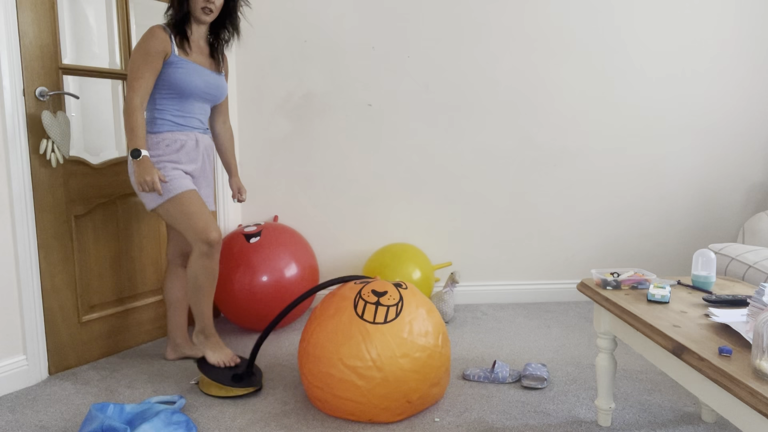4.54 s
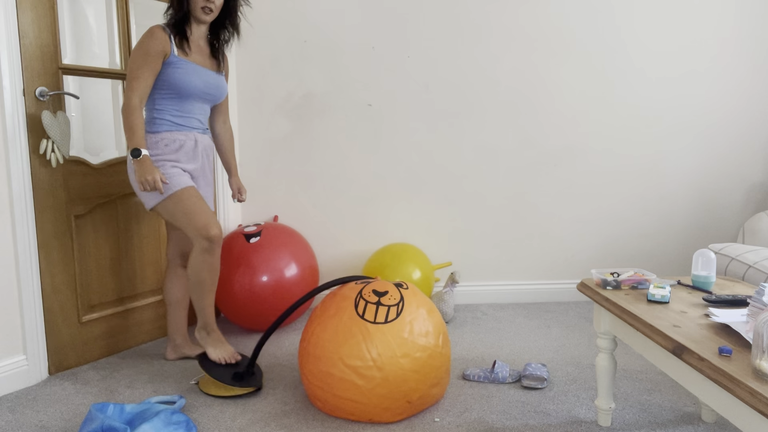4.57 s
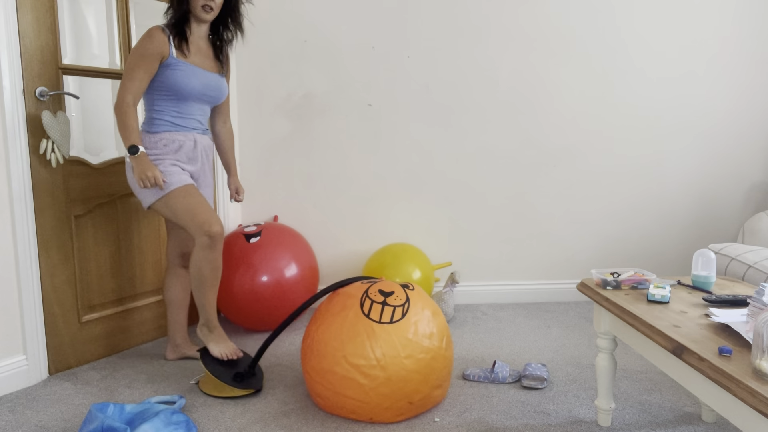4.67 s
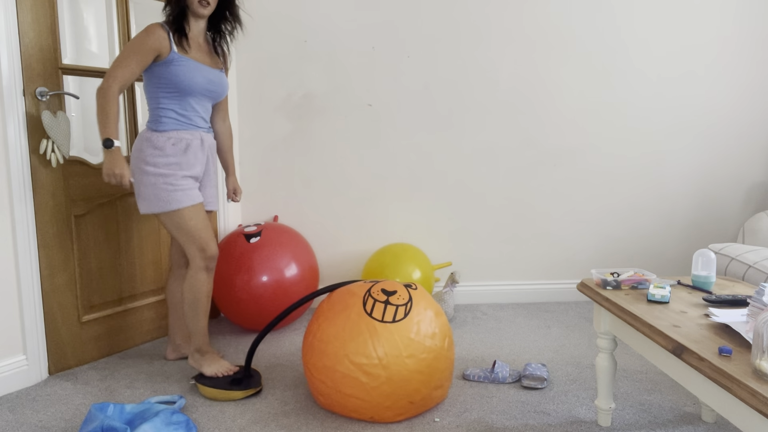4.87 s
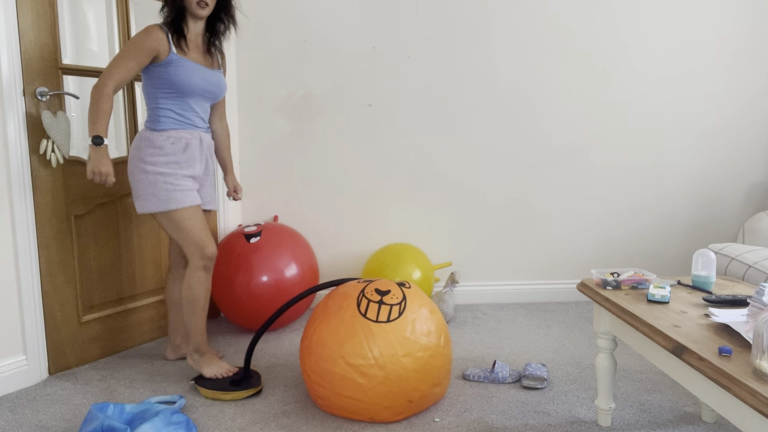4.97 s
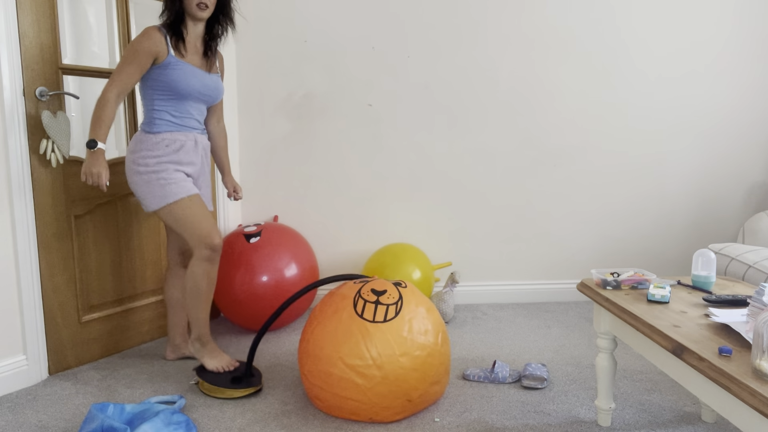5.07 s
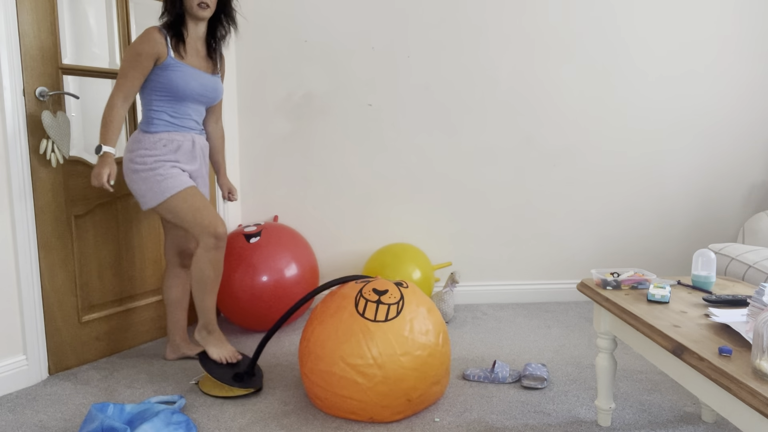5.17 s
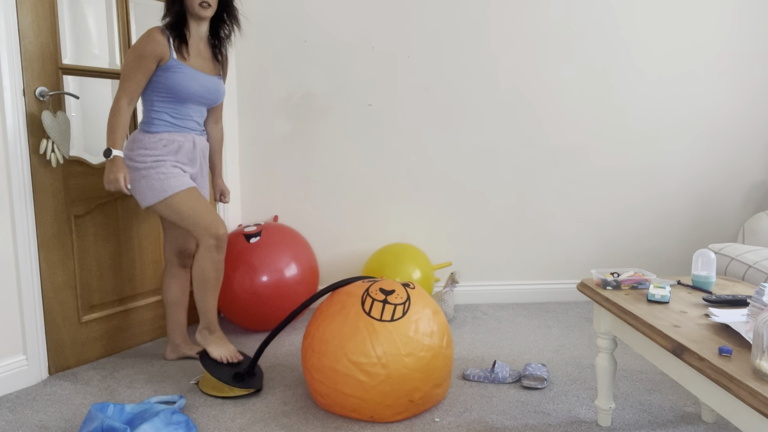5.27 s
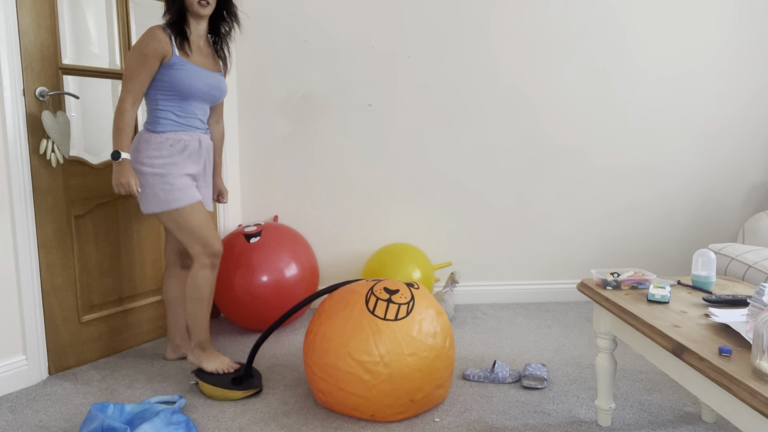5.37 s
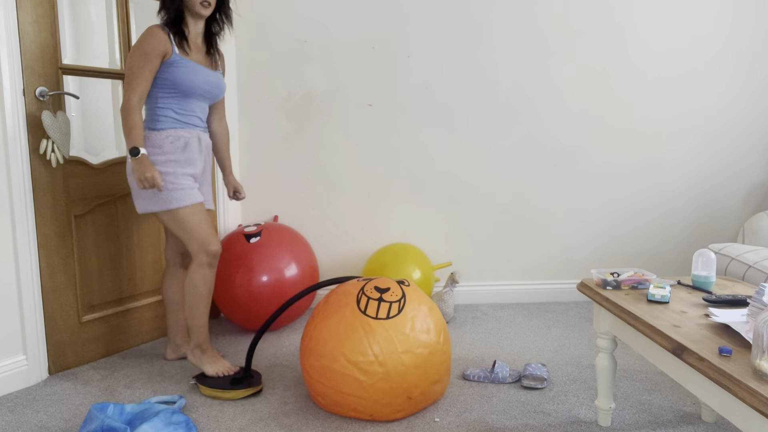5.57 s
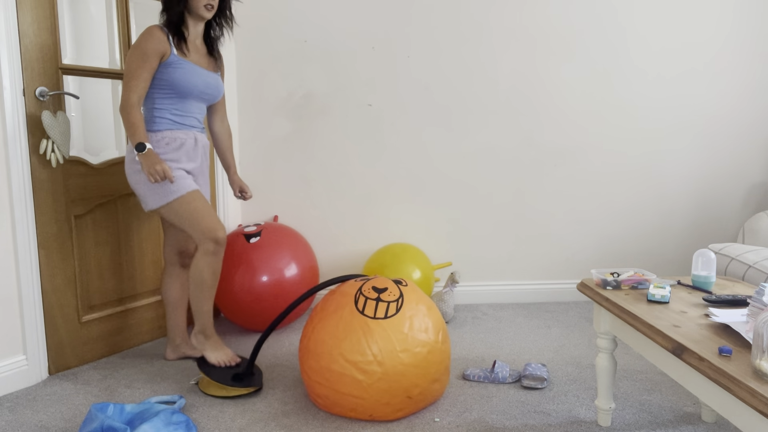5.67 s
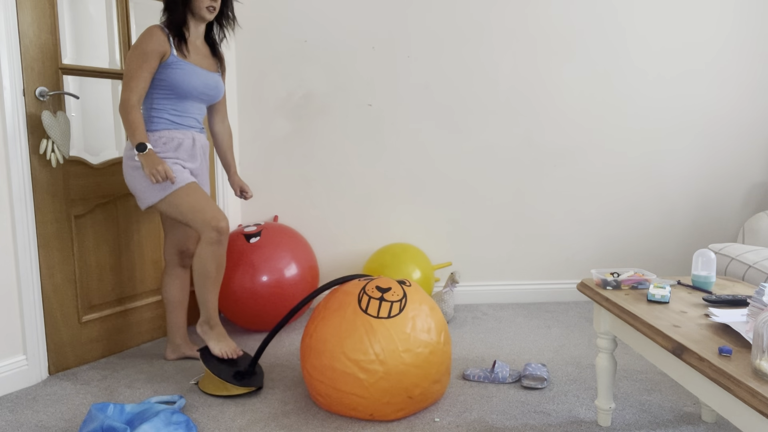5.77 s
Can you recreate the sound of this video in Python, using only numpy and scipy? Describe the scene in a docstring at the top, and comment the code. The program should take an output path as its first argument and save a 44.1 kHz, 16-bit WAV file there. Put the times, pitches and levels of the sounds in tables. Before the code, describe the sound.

A foot pump is worked in steady strokes, each a crumpling thump and airy hiss followed by a hollow rasping rebound.

```python
"""Foot pump filling a ball

A ribbed plastic foot pump fills a big rubber ball in a small carpeted room, ten strokes in a row.
Each push buckles the bellows: crumpling noise excites the hollow body, and a turbulent jet hisses
through the nozzle into the ringing ball. As the foot lifts, the folds rumble and rasp open, noise
sputters in at the inlet and the valve cracks; decaying floor modes thud softly under both movements.
"""
import sys
import numpy as np
from scipy import signal
from scipy.fft import rfft, irfft
from scipy.io import wavfile
from scipy.ndimage import uniform_filter1d

SR = 44100
rng = np.random.default_rng(int(sys.argv[2]) if len(sys.argv) > 2 else 0)


def dump_mix(stems):
    """Bounce the given channels to the path in sys.argv[1] as a 16-bit WAV at rate SR."""
    frames = np.atleast_2d(stems).T  # one column per channel
    limited = np.clip(frames, -1, 1)  # hard clip at full scale
    pcm = np.round(limited * 32767).astype(np.int16)
    wavfile.write(sys.argv[1], SR, pcm)


N = 257103
TIME = np.arange(N) / SR

# Downstrokes, levels relative: t/s, push length/s, jet level/dB, creep before the collapse/s,
# collapse level/dB, collapse t60/s, second collapse level/dB, body boom/dB, valve level/dB, floor level/dB
STROKES = [(.068, 0.28, -35.5, 0.021, -25.5, 0.18, -34, 0, -36.5, -36),
           (0.662, 0.27, -35, 0.0078, -28.5, 0.21, -31.5, 5.5, -35, -36),
           (1.277, .26, -35, 0.015, -24.5, 0.26, -35, -6, -35.5, -36),
           (1.862, 0.29, -36.5, 0.045, -26.5, 0.11, -31, 2.5, -44, -35.5),
           (2.439, 0.27, -36, 0.028, -26.5, 0.26, -32, -4, -35.5, -33.5),
           (3.012, .26, -35.5, .05, -22, 0.16, -29, 1, -33, -33),
           (3.560, 0.26, -35.5, 0.028, -26.5, 0.28, -42, 4.5, -38, -39),
           (4.12, .26, -35.5, .012, -26.5, 0.29, -32, -1.5, -36.5, -39),
           (4.708, 0.27, -36.5, 0.024, -24, 0.086, -30.5, 1, -37.5, -33),
           (5.28, 0.26, -37, 0.025, -21.5, 0.16, -37, -1, -36.5, -39.5)]
# The foot lifts and the bellows spring open, levels relative: t/s, unfolding beforehand/s,
# fold rumble level/dB, fold rasp level/dB, inlet level/dB, body boom/dB, flap popping open level/dB,
# floor level at the release/dB, floor level as the weight shifts back/dB
LIFTS = [(0.447, 0.047, -27, -33.5, -44.5, 3, -45, -36, -32),
         (1.064, 0.048, -27.5, -33, -44, 1.5, -32, -46, -33.5),
         (1.659, 0.059, -27.5, -34, -44.5, 0, -33, -32.5, -41.5),
         (2.239, 0.048, -26, -34.5, -45, 1, -35, -34, -38.5),
         (2.808, 0.048, -28, -34, -44.5, 2, -43, -49, -33.5),
         (3.360, 0.061, -27.5, -36, -47, -1, -34.5, -45, -43),
         (3.912, 0.054, -26, -34.5, -44.5, -1.5, -33.5, -36.5, -43),
         (4.491, 0.037, -28, -36, -46.5, -2, -38, -42, -40.5),
         (5.062, 0.043, -27.5, -33, -48.5, 0, -50, -34.5, -42),
         (5.63, 0.058, -29.5, -35.5, -45.5, 0.5, -34.5, -39, -47)]
# Resonances of the hollow body: f/Hz, bandwidth/Hz, boost/dB
BODY_MODES = [(136.6, 19, 5), (240.7, 42, 6.5), (274.8, 10, 6.5), (309.6, 16.5, 4.5), (351.6, 4.9, 2),
              (450, 39, 8.5), (540.5, 30, 9), (751, 60, 6.5), (985, 40, 0), (1119, 42, 2.5), (1396, 69, 3),
              (1860, 61, 2.5)]
# Resonances of the hose: f/Hz, bandwidth/Hz, boost/dB
HOSE_MODES = [(810, 70, 2.7), (1860, 180, 3.7), (2260, 19, 2.4), (2520, 33, 5.4), (2960, 74, 3)]
VALVE_LAG_S = .0035  # the flap slaps shut as the pressure rises
DRAW_PEAK_S = 0.056  # the indrawn air peaks this long after the release


def from_db(db):
    """Amplitude ratio of a level difference: 20 dB per factor of ten."""
    return 10 ** (np.asarray(db) / 20)


def at_hz(points, hz):
    """Linear interpolation of a table on a log-frequency axis."""
    at, value = np.transpose(points)
    return np.interp(np.log(np.maximum(hz, 1)), np.log(at), value)


def causal(gain):
    """Minimum-phase response: folding the cepstrum ties the phase to the log gain."""
    cepstrum = irfft(np.log(gain))
    half = cepstrum.shape[-1] // 2
    cepstrum[..., 1:half] *= 2
    cepstrum[..., half + 1:] = 0
    return np.exp(rfft(cepstrum))


def coloured(x, spectrum):
    """Spectral shaping by convolution with a causal impulse response."""
    size = 8192
    gain = from_db(at_hz(spectrum, np.fft.rfftfreq(size, 1 / SR)))
    response = irfft(causal(gain))
    return signal.fftconvolve(x, response[:size // 2])[:len(x)]


def resonant(x, modes):
    """Resonance: each mode lifts a narrow band and rings on."""
    for hz, width_hz, boost_db in modes:
        ringing = signal.lfilter(*signal.iirpeak(hz, hz / width_hz, fs=SR), x)
        x = x + (from_db(boost_db) - 1) * ringing
    return x


def unit_band(x, low_hz, high_hz):
    """Band-level normalisation: the whole signal is scaled to rms 1 within the band."""
    band = signal.sosfilt(signal.butter(2, [low_hz, high_hz], "band", fs=SR, output="sos"), x)
    return x / np.std(band)


def crumple(spectrum, per_s, spread_db, rub):
    """Crackling noise: random grains over smooth rubbing, coloured and held at an even level."""
    struck = rng.random(N) < per_s / SR
    sign = rng.choice([-1, 1], N)
    size = from_db(spread_db * np.minimum(rng.exponential(1, N), 4))
    grains = struck * sign * size
    x = coloured(grains / np.std(grains) + rub * rng.standard_normal(N), spectrum)
    return x / np.sqrt(uniform_filter1d(x ** 2, size=500) + 1e-12)


def burst(t60, rise_s=.001):
    """Transient of unit energy: noise with a quick rise and exponential decay."""
    t = TIME[:SR // 6]
    x = rng.standard_normal(len(t)) * from_db(-60 * t / t60) * (1 - np.exp(-t / rise_s))
    return x / np.linalg.norm(x)


def add(track, s, sound):
    """Superposition of a sound onto the track from time s."""
    at = round(s * SR)
    track[at:at + len(sound)] += sound[:N - at]


def flutter(depth_db, per_s):
    """Turbulent modulation: a gain that wavers at random."""
    steps = rng.standard_normal(N)
    return from_db(depth_db * np.interp(TIME * per_s, np.arange(N), steps))


def booming(x, times, boom_db, ahead_s=.06, boom_hz=330):
    """Mechanical loading: each movement of the foot draws its own amount of bass from the body."""
    latest = np.maximum(np.searchsorted(times - ahead_s, TIME) - 1, 0)
    bass = signal.sosfiltfilt(signal.butter(3, boom_hz, fs=SR, output="sos"), x)
    return x + (from_db(boom_db[latest]) - 1) * bass


def diffuse(pair):
    """Interaural coherence: mid and side of two noises, weighted by frequency; returns spectra."""
    # Left-right correlation of the diffuse field: f/Hz, correlation (-1..1)
    likeness = [(60, 0.84), (250, 0.85), (450, 0.1), (800, -0.33), (2000, 0.031), (16000, 0.34)]
    mid, side = rfft(pair)
    alike = np.clip(at_hz(likeness, np.fft.rfftfreq(pair.shape[1], 1 / SR)), -1, 1)
    return (np.sqrt(1 + alike) * mid + np.sqrt(1 - alike) * side * [[1], [-1]]) / np.sqrt(2)


def room(x, early_t60=0.015, late_t60=0.19, late_db=-12, right_lag_s=.000083):
    """Room response: direct sound, reaching the left first, plus dense reflections and a short tail."""
    # Direct share of the sound power: f/Hz, share (0-1)
    direct = [(100, 0.5), (300, 0.28), (600, 0.39), (1500, 0.29), (2800, 0.34), (5500, 0.09), (7500, 0.61),
              (16000, 1)]
    size, lead = 2 ** 15, 64  # samples
    t, hz = TIME[:size], np.fft.rfftfreq(size, 1 / SR)
    decay = from_db(-60 * t / early_t60) + from_db(late_db - 60 * t / late_t60)
    decay = decay * (t > .003)
    echoes = diffuse(rng.standard_normal((2, size)) * decay / np.linalg.norm(decay))
    share = np.clip(at_hz(direct, hz), 0, 1)
    arrival = np.exp(-2j * np.pi * hz * [[0], [right_lag_s]])
    paths = np.sqrt(share) * arrival + np.sqrt(1 - share) * echoes
    # the walls add fine ripple but no broad colour
    paths = paths * causal(1 / np.sqrt(uniform_filter1d(abs(paths) ** 2, size=52)))
    response = np.roll(irfft(paths), lead, axis=1)[:, :size // 2]
    return signal.fftconvolve(x[None], response, axes=1)[:, lead:lead + N]


def room_tone(tone_db=-46, hum_hz=63.8, hum_db=-57.5):
    """Diffuse background: partly correlated rumble of the house with a low sinusoidal hum."""
    # Spectrum of the rumble: f/Hz, relative level/dB
    rumble_colour = [(20, -39), (32, -16), (42, 4.5), (62, 10), (85, -3), (140, -2), (300, -9), (700, -2),
                     (2000, -15.5), (5000, -27), (16000, -58)]
    noise = np.array([coloured(white, rumble_colour) for white in rng.standard_normal((2, N))])
    rumble = irfft(diffuse(noise / np.std(noise)), N)
    hum = np.sqrt(2) * np.sin(2 * np.pi * hum_hz * TIME)
    return from_db(tone_db) * rumble + from_db(hum_db) * hum


def floorboards(thud_db=5.5, rise_s=0.0054, press_lag_s=0.0263, release_lag_s=0.01045, back_lag_s=0.089):
    """Modal excitation: presses, releases and weight shifts set low floor modes decaying."""
    # Floorboard modes: f/Hz, relative level/dB, t60/s
    floor_modes = [(50, -19, 0.29), (61, -11, 0.27), (101.5, -3, 0.14), (136.4, -1, 0.24)]
    # on a press the weight reaches the floor late; after a release it moves to the other foot
    thuds = [(s + press_lag_s, db) for s, *_, db in STROKES]
    for s, *_, release_db, back_db in LIFTS:
        thuds += [(s + release_lag_s, release_db), (s + back_lag_s, back_db)]
    out, t = np.zeros(N), TIME[:SR // 2]
    for s, peak_db in thuds:
        thud = np.zeros(len(t))
        for hz, db, t60 in floor_modes:
            cycles = hz * rng.normal(1, 0.012) * t + rng.random()  # pitch varies a little each time
            thud += from_db(db - 60 * t / t60) * np.sin(2 * np.pi * cycles)
        add(out, s, from_db(peak_db + thud_db) * thud * (1 - np.exp(-t / rise_s)))
    return out


def draw(open_s=0.037, width_s=0.069):
    """Suction flow for each lift: the flap opens, then the flow swells and ebbs as a Gaussian."""
    t = TIME - np.array(LIFTS)[:, :1]
    opening = np.clip(1 + t / open_s, 0, 1)
    # width_s: from the peak to 1/e of the flow
    return opening * np.exp(-np.minimum(((t - DRAW_PEAK_S) / width_s) ** 2, 20))


def inlet(inlet_db=1.0, bright_db=-12, bright_hz=8000):
    """Flow noise: a dull hiss sputters past the flap, brightest at full flow."""
    # Spectrum of the indrawn air: f/Hz, relative level/dB
    inlet_colour = [(500, -47), (1800, 0), (3200, 3.5), (4500, 0), (5200, -6.5), (7500, -9), (10500, -13),
                    (13500, -18), (16000, -27)]
    strength, flow = from_db(inlet_db + np.array(LIFTS)[:, 4]), draw()
    hiss = resonant(crumple(inlet_colour, per_s=2500, spread_db=3.5, rub=1.0), HOSE_MODES)
    high_pass = signal.butter(2, bright_hz, "high", fs=SR, output="sos")
    bright = signal.sosfilt(high_pass, rng.standard_normal(N))
    dull = strength @ flow * unit_band(hiss, 2500, 5000)
    # the bright part grows with a higher power of the flow
    return dull + from_db(bright_db) * (strength @ flow ** 4) * bright


def valve(tick_db=21.0, shut_t60=0.092, shut_rise_s=0.002, open_t60=0.03, flick_db=-38, flick_t60=0.026):
    """Impact noise: the thin flap cracks shut, pops open and flicks against its stop near full draw."""
    # Spectrum of the flap's cracks: f/Hz, relative level/dB
    crack_colour = [(500, 6), (1800, 9.5), (3000, 10), (4400, 9), (5200, -0.5), (7500, -0.5), (16000, -24)]
    cracks = np.zeros(N)
    for s, *_, valve_db, _ in STROKES:
        add(cracks, s + VALVE_LAG_S, from_db(valve_db) * burst(shut_t60, shut_rise_s))
    for s, *_, pop_db, _, _ in LIFTS:
        add(cracks, s, from_db(pop_db) * burst(open_t60))
        flick_s = s + DRAW_PEAK_S * rng.uniform(0.98, 1.2)
        add(cracks, flick_s, from_db(flick_db) * burst(flick_t60))
    return from_db(tick_db) * coloured(cracks, crack_colour)


def unfolding(creep_db, settle_db_per_s, start_s=0.013, spring_s=0.016):
    """Elastic recoil: gain of the folds for each lift as they creep, spring open and settle."""
    gains = []
    for s, creep_s, *_ in LIFTS:
        t = TIME - s
        creep = from_db(creep_db) * np.clip((t + creep_s) / start_s, 0, 1)
        spring = from_db(creep_db * np.clip(-t / spring_s, 0, 1) - creep_db)
        gains.append(creep * spring * from_db(-settle_db_per_s * np.maximum(t, 0)))
    return np.array(gains)


def bellows(refill_db=-3.5, rasp_db=2.5):
    """Source and resonator: folds rumble and rasp as they spring open, ringing in the body."""
    # Spectrum of the fold rumble: f/Hz, relative level/dB
    refill_colour = [(60, -7.5), (150, -5), (250, -2), (400, -4), (720, -2.5), (1000, -21), (1700, -40),
                     (4000, -24.5), (16000, -53)]
    # Spectrum of the fold rasp: f/Hz, relative level/dB
    rasp_colour = [(300, -44), (700, -1.5), (950, 6.5), (1300, 1.5), (2000, -4), (2500, -16.5), (5000, -19),
                   (16000, -36)]
    times, _, rumbles_db, rasps_db, _, boom_db, *_ = np.transpose(LIFTS)
    rumble_gain = from_db(refill_db + rumbles_db) @ unfolding(creep_db=-8.5, settle_db_per_s=117.5)
    rumble = rumble_gain * crumple(refill_colour, per_s=600, spread_db=2.5, rub=0.79)
    rasp_gain = from_db(rasp_db + rasps_db) @ unfolding(creep_db=-10.5, settle_db_per_s=125)
    rasp = rasp_gain * crumple(rasp_colour, per_s=700, spread_db=3.0, rub=0.58)
    return resonant(booming(rumble, times, boom_db) + rasp, BODY_MODES)


def snaps(thump_db=30.5, swing_s=0.00059):
    """Snap-through: a fold that flips over pushes the air, then pulls it back."""
    # Single folds snapping over: t/s, relative peak level/dB
    snap_events = [(.453, -16), (.710, -19), (1.062, -33), (1.665, -11), (2.25, -11.5), (2.485, -21),
                   (3.024, -33), (3.030, -8.5), (3.365, -19), (3.573, -16), (4.161, -9.5), (4.494, -19),
                   (5.296, -36)]
    # Spectrum of a snap: f/Hz, relative level/dB
    snap_colour = [(60, -28), (250, -6), (750, -4), (1100, -11.5), (1900, -4.5), (2600, -63), (5000, -29),
                   (16000, -67)]
    kicks = np.zeros(N)
    for s, peak_db in snap_events:
        kick = from_db([peak_db + thump_db]) / 2
        add(kicks, s, kick)
        add(kicks, s + swing_s, -kick)
    return resonant(coloured(kicks, snap_colour), BODY_MODES)


def ball(x, count=900, t60=1):
    """Cavity resonance: the air in the ball rings with many close modes, heard through the rubber."""
    # Transmission through the rubber: f/Hz, relative level/dB
    ball_colour = [(200, -5.5), (700, -1), (1100, 2), (1900, 3), (2600, 0), (5000, -5), (16000, -35)]
    t = TIME[:SR // 2]
    lines = np.zeros(len(t) // 2 + 1, complex)
    at = rng.uniform(300, 6000, count) * len(t) / SR  # Hz to spectral bins
    lines[at.astype(int)] = np.exp(2j * np.pi * rng.random(count))
    modes = irfft(lines) * from_db(-60 * t / t60)
    return coloured(signal.fftconvolve(x, modes / np.linalg.norm(modes))[:N], ball_colour)


def jet(jet_db=-0.95, ring_db=-12):
    """Jet turbulence: air forced through the nozzle hisses with each push and sets the ball ringing."""
    # Air flow during one push: share of the push length, relative level/dB
    push_flow = [(0, -41), (.1, -21), (.22, -7.5), (.35, -2.5), (.48, -2), (.62, -3.5), (.8, -8.5),
                 (1, -15.5), (1.3, -28)]
    # Spectrum of the jet: f/Hz, relative level/dB
    jet_colour = [(100, 7), (300, 1.5), (800, 5), (1700, 3.5), (2600, 2), (4000, 3), (5500, 0.5),
                  (8000, 0.5), (10500, 1.5), (13500, -1), (16000, -1.5)]
    share, flow_db = np.transpose(push_flow)
    flow = np.zeros(N)
    for s, length_s, db, *_ in STROKES:
        progress = (TIME - s - VALVE_LAG_S) / length_s
        flow += from_db(db + np.interp(progress, share, flow_db, left=-120, right=-120))
    hiss = resonant(coloured(rng.standard_normal(N), jet_colour), HOSE_MODES)
    turbulence = flutter(depth_db=0.35, per_s=40)
    hiss = from_db(jet_db) * flow * turbulence * unit_band(hiss, 9000, 15000)
    return hiss + from_db(ring_db) * ball(hiss)


def collapse(s, creep_s, db, t60, rise_s=0.0048, creep_db=-13.0, start_db=-33.0):
    """Buckling instability: power creeps up, gives way within milliseconds and dies down."""
    t = TIME - s
    swell_db = np.interp(t, [-creep_s, 0, rise_s], [start_db, creep_db, 0], left=-120)
    return from_db(db + swell_db - 60 * np.clip(t - rise_s, 0, 1) / t60) ** 2


def buckling(second_lag_s=0.036, second_creep_s=0.0089, second_t60=0.23):
    """Incoherent addition: the powers of two collapses per push add; returns an amplitude."""
    power = np.zeros(N)
    for s, _, _, creep_s, db, t60, second_db, *_ in STROKES:
        power += collapse(s, creep_s, db, t60)
        # the lower folds give way after the upper ones
        power += collapse(s + second_lag_s, second_creep_s, second_db, second_t60)
    return np.sqrt(power)


def squash(squash_db=0.0):
    """Source and resonator: pressed folds rumble dully and ring in the hollow body."""
    # Spectrum of the pressed folds: f/Hz, relative level/dB
    squash_colour = [(60, -18.5), (170, -8.5), (250, 1.5), (400, -3.5), (750, -2.5), (1100, -8),
                     (1700, -16), (2600, -29), (5000, -42), (16000, -66)]
    times, *_, boom_db, _, _ = np.transpose(STROKES)
    noise = crumple(squash_colour, per_s=800, spread_db=2.0, rub=0.8)
    folds = from_db(squash_db) * buckling() * noise
    return resonant(booming(folds, times, boom_db), BODY_MODES)


def scene(pump_left_db=0.45, floor_left_db=2.1):
    """Superposition: each part has its own room paths; level differences set pump and floor to the left."""
    floor = floorboards() * from_db([[floor_left_db], [-floor_left_db]])
    pump = room(valve() + inlet()) + room(bellows() + snaps()) + room(squash())
    pump = pump * from_db([[pump_left_db], [-pump_left_db]])
    # two independent hisses share the power
    hiss = (room(jet()) + room(jet())) / np.sqrt(2)
    return room_tone() + floor + hiss + pump


def record(dry):
    """Band limiting: the deepest rumble is removed and the top is cut steeply."""
    thinned = signal.sosfilt(signal.butter(8, 35, "high", fs=SR, output="sos"), dry)
    return signal.sosfilt(signal.ellip(12, .1, 90, 15850, fs=SR, output="sos"), thinned)


dry = scene()
out = record(dry)
dump_mix(out)
```